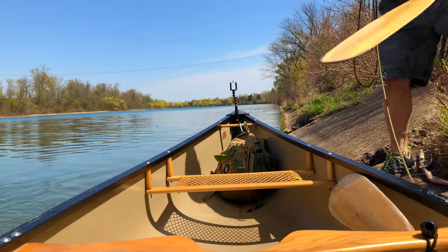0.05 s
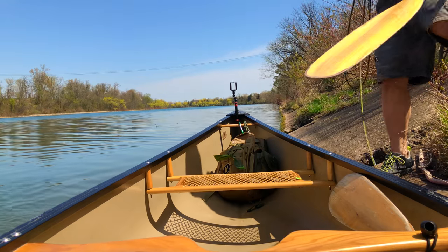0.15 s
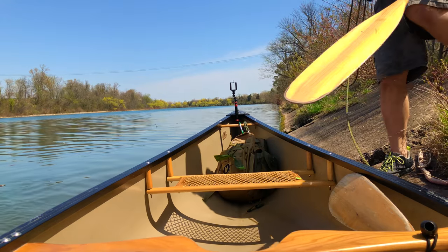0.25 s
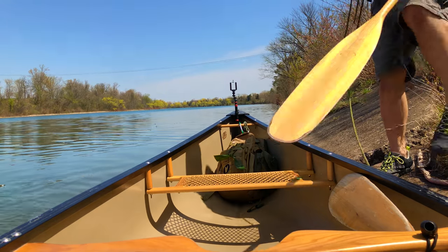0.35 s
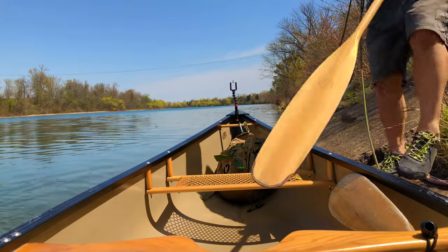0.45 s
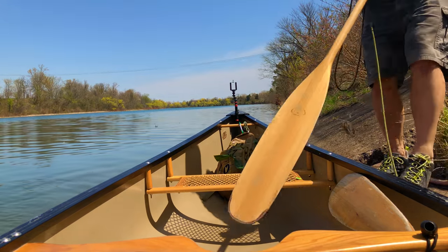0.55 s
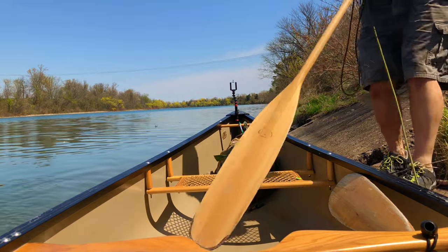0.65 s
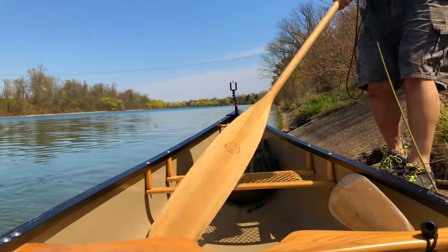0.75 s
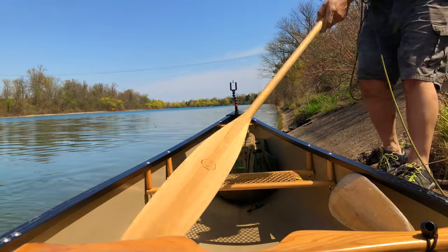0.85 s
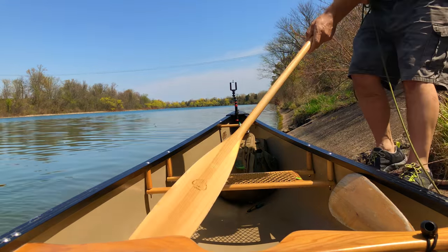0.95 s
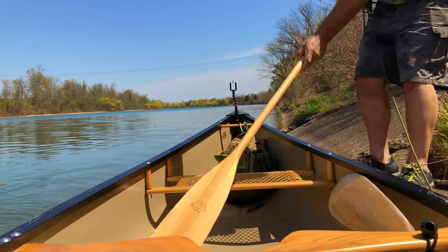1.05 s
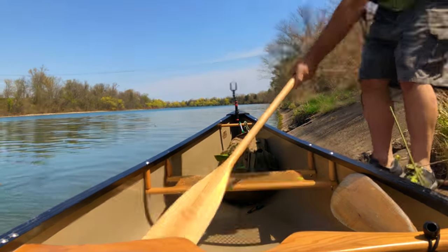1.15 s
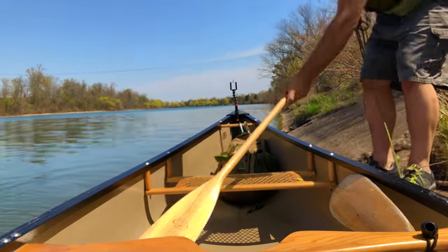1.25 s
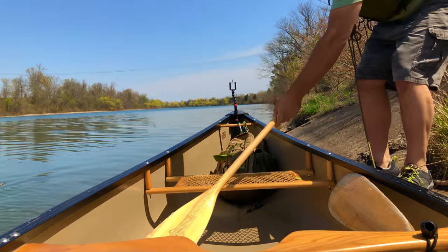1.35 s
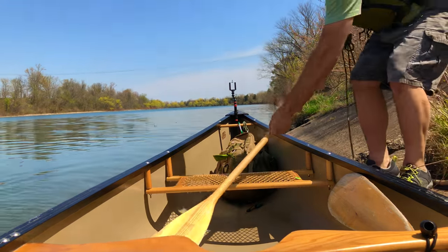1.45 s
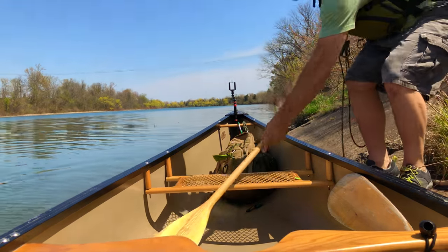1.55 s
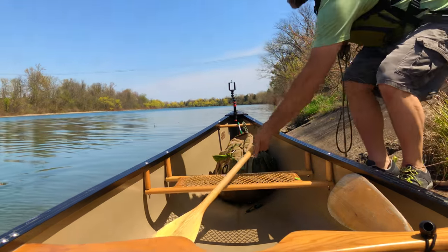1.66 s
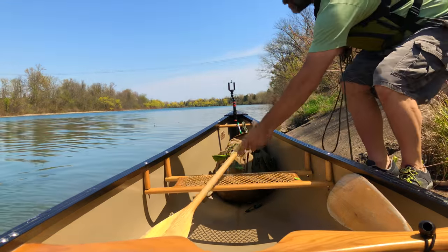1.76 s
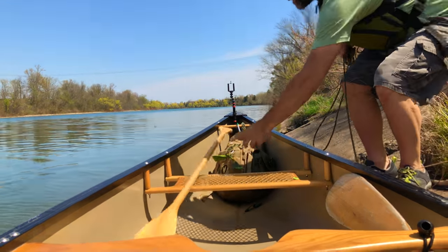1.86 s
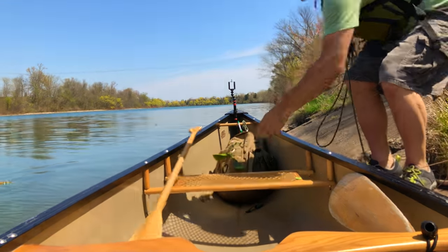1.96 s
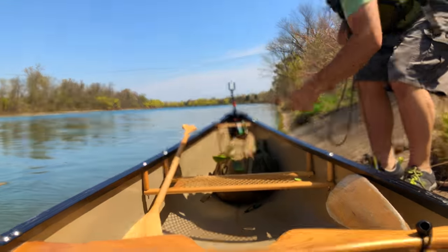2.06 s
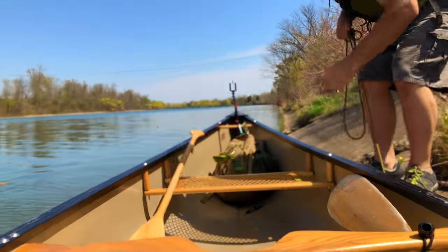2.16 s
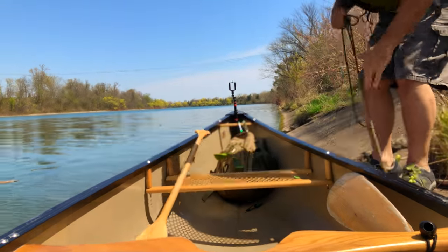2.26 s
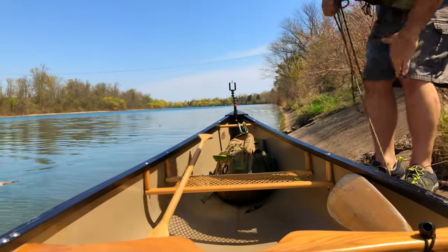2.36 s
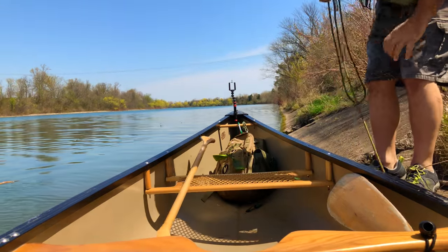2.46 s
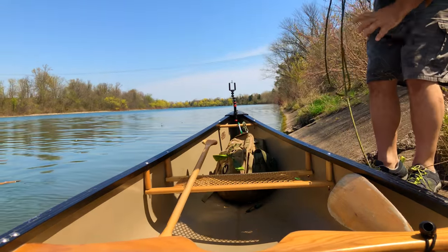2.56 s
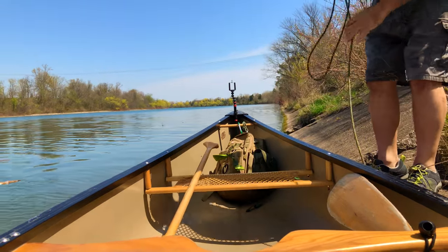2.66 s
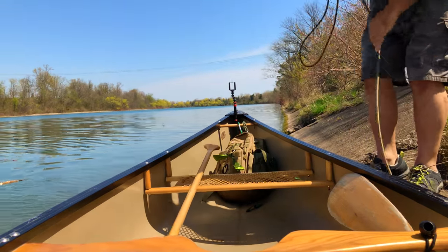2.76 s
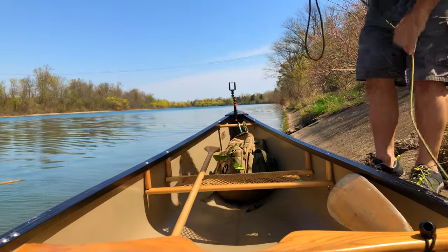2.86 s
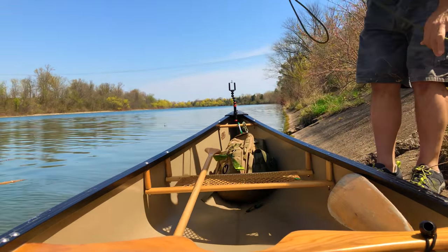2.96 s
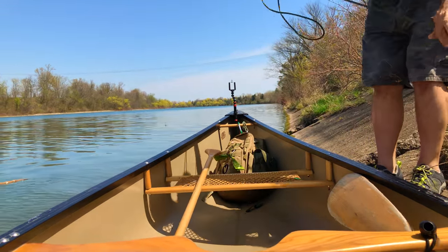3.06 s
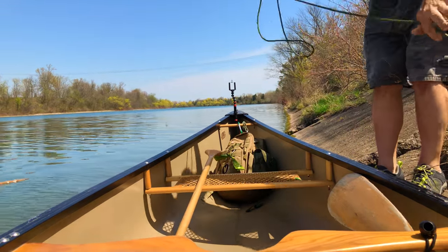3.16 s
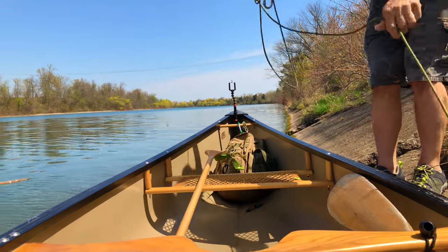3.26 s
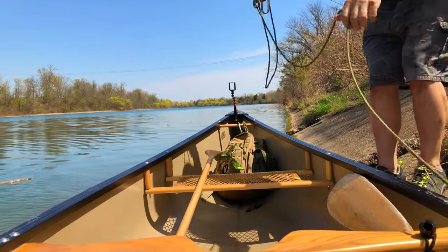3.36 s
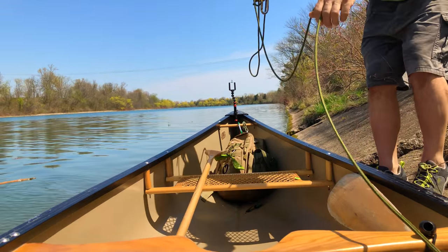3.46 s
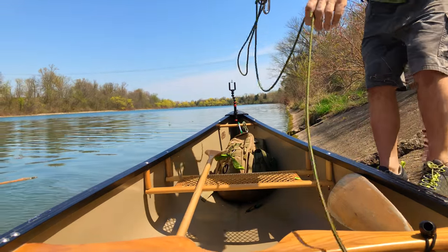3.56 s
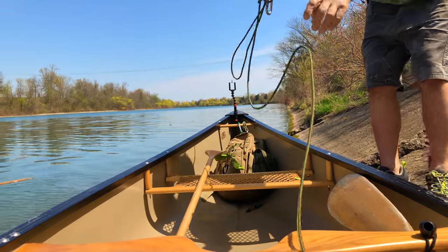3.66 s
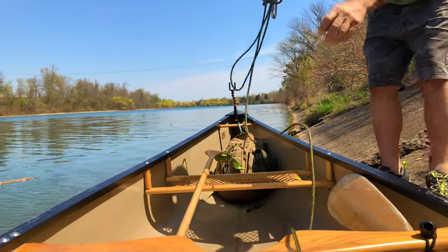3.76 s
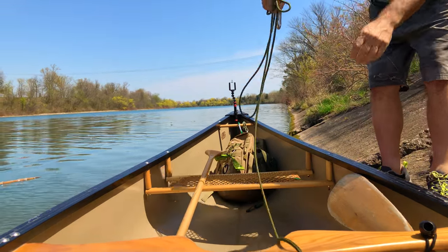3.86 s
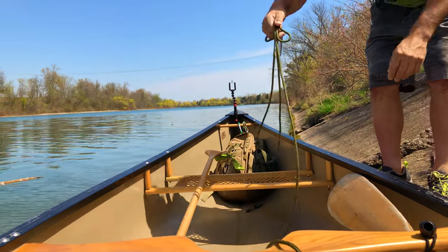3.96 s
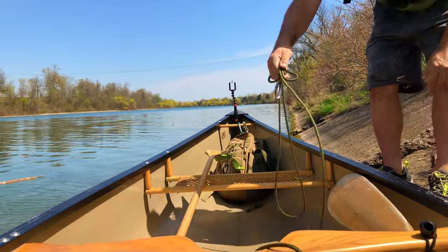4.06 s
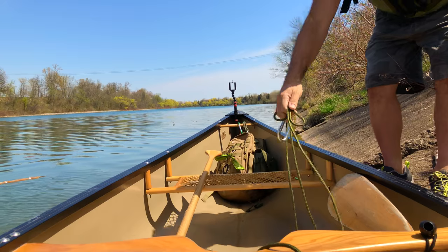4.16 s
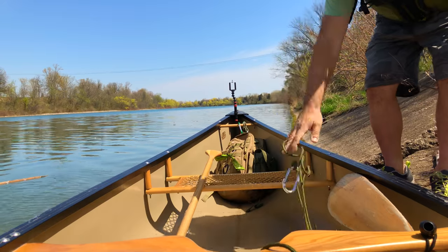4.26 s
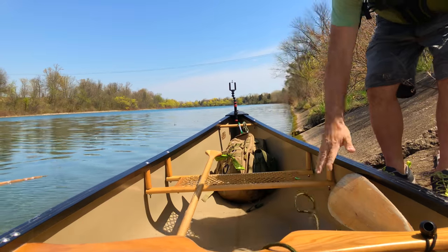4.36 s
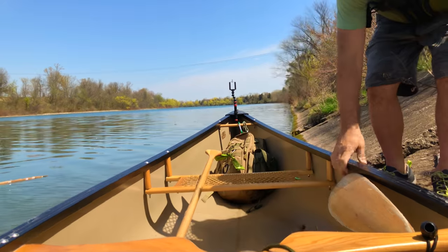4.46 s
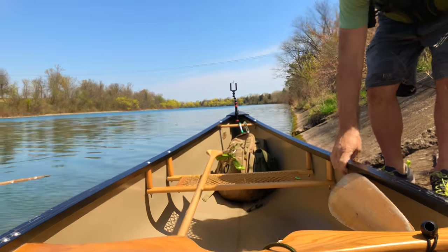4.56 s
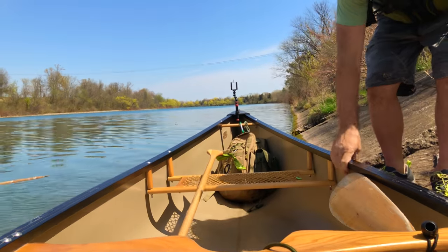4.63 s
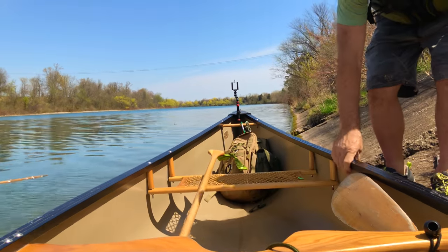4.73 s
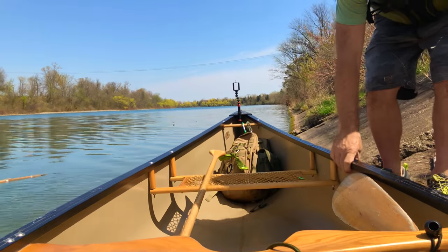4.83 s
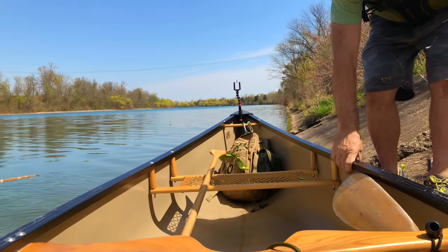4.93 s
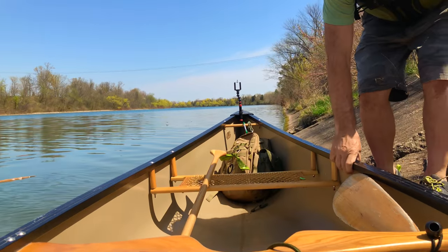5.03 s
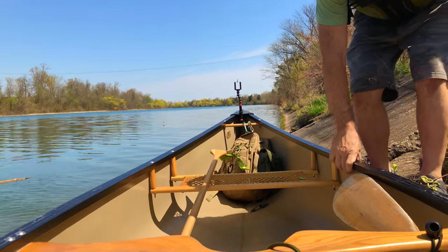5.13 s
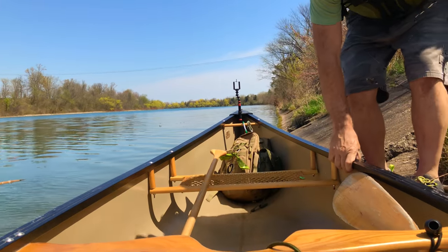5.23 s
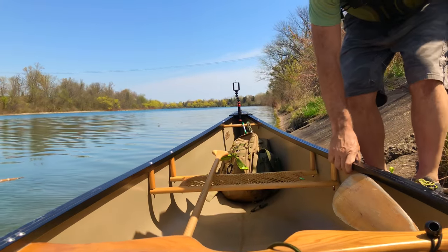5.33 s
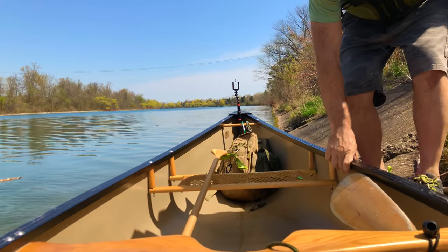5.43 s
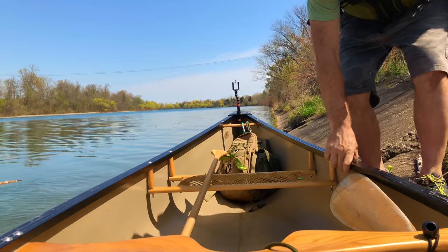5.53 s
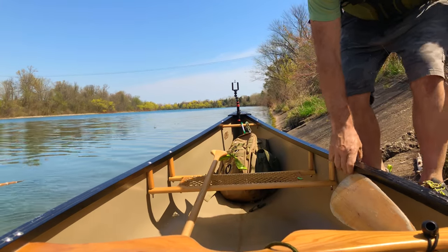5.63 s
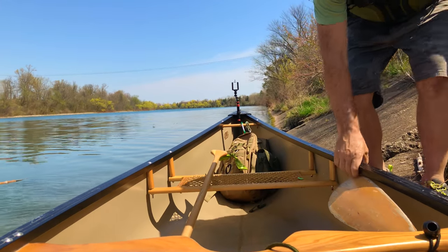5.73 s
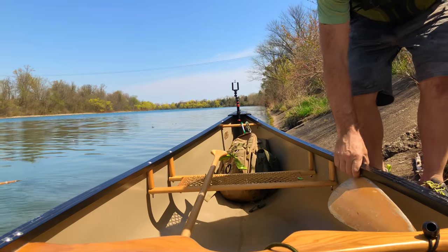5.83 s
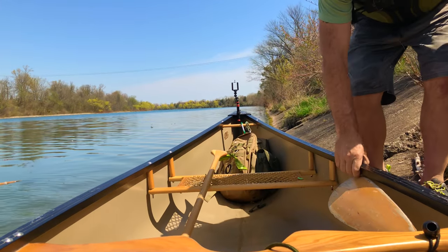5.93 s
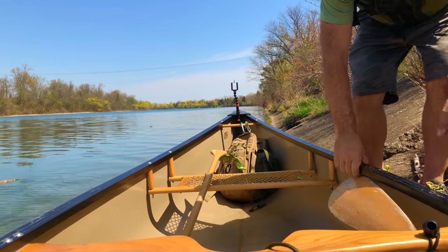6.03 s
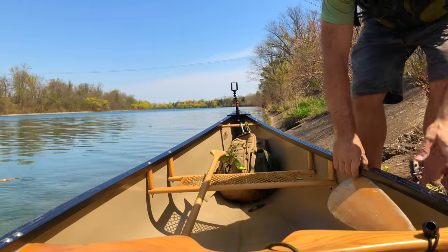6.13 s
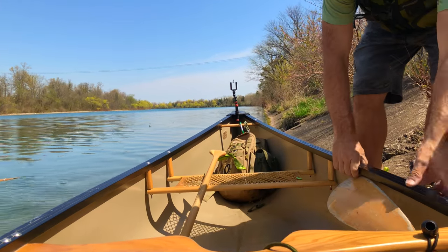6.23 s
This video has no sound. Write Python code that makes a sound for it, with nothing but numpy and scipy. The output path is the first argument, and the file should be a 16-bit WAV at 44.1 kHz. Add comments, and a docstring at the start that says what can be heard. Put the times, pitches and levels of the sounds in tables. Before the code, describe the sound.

Inside a moored canoe: soft water laps, a clattering wooden paddle and stuttering scrape, a sharp gunwale knock with metal clink, a short squeal and scuff.

```python
"""Loading a canoe at a canal bank

Heard from inside a canoe that lies against a concrete bank while someone loads it and gets ready to step in. A
wooden paddle touches down, clatters into the hull and slides; a snap hook and a hand land on the gunwale.
Knocks travel through the thin hull as bending waves that run through noise echoes and paddle modes. Laps and
two light knocks are short swelling tones; rubbing, scuffing and gear are slips and noise in resonances.
Coloured noise is the water along the bank and the paddle's soft hiss; a far bird whistles a gliding sine."""
import sys
import numpy as np
from scipy import signal
from scipy.fft import rfft, irfft
from scipy.io import wavfile

SR = 44100
rng = np.random.default_rng(int(sys.argv[2]) if len(sys.argv) > 2 else 0)


def int16_out(signal):
    """Quantize to a 16-bit WAV file."""
    q = np.round(np.clip(np.atleast_2d(signal).T, -1, 1) * 32767)
    wavfile.write(sys.argv[1], SR, q.astype(np.int16))


N = 277328
TIME = np.arange(N) / SR
ALL_HZ = np.arange(N // 2 + 1) * SR / N
# time and frequency axes of one short event
SIZE = 32768
AGE, FREQ = np.arange(SIZE) / SR, np.arange(SIZE // 2 + 1) * SR / SIZE


def from_db(db):
    """Decibels to gain."""
    return 10 ** (np.asarray(db) / 20)


def rms_one(x):
    """Scale to unit rms."""
    return x / np.sqrt(np.mean(x ** 2) + 1e-20)


def at_hz(points, hz):
    """Read (Hz, value) points on a log-frequency axis."""
    known_hz, values = np.transpose(points)
    return np.interp(np.log(np.maximum(hz, 1)), np.log(known_hz), values)


def add(out, sound, s):
    """Mix a sound in from time s."""
    start = int(round(s * SR))
    skip, start = max(-start, 0), max(start, 0)
    part = sound[skip:skip + N - start]
    out[start:start + len(part)] += part


def fade(t60):
    """Exponential decay by 60 dB in t60."""
    return np.exp(-np.log(1000) * AGE / t60)


def drift(rate):
    """Slow random wandering of rms 1 through `rate` bounded random points a second."""
    knots = rng.uniform(-1, 1, 8192)
    return rms_one(np.interp(TIME * rate, np.arange(len(knots)), knots))


def swells(rows):
    """Gain over time of (middle, length, dB) movements that rise and fall smoothly."""
    return sum(from_db(db) * 0.5 ** ((2 * (TIME - s) / length) ** 2) for s, length, db in rows)


def stroke(start, length, attack_s, release_s, sag_db):
    """Gain of a rubbing stroke: it sets in, sags over its length (negative sag: grows) and dies away."""
    age = TIME - start
    attack = np.clip(age / attack_s, 0, 1)
    sag = from_db(-sag_db * np.clip(age / length, 0, 1))
    release = np.exp(-np.maximum(age - length, 0) / release_s)
    return attack * sag * release


def resonance(freq, hz, width):
    """Response of one resonator, 1 on top."""
    return 1j * freq * width / (hz ** 2 - freq ** 2 + 1j * freq * width)


def coloured(x, spectrum):
    """Give a long signal a (Hz, dB) spectrum; rms 1."""
    return rms_one(irfft(rfft(x) * from_db(at_hz(spectrum, ALL_HZ)), N))


def grains(per_s, spread_db):
    """Random tiny slips of uneven size and either sign; rms 1."""
    sizes = from_db(spread_db * np.minimum(rng.exponential(1, N), 4))
    signs = rng.choice([-1, 1], N)
    happens = rng.random(N) < per_s / SR
    return rms_one(sizes * signs * happens)


def slip_train(per_s, jitter, spread_db):
    """Stick and slip at a nearly regular rate: one uneven click for each slip; rms 1."""
    cycles = np.cumsum(per_s * (1 + jitter * drift(300))) / SR
    clicks = np.diff(np.floor(cycles), prepend=0)
    return rms_one(clicks * from_db(spread_db * rng.standard_normal(N)))


def body(slips, modes, wander_db=2.4, wander_per_s=16):
    """Slips ring (Hz, width, dB) resonances, each swelling and fading as the contact moves; rms 1."""
    out = 0
    for hz, width, db in modes:
        narrow = signal.iirpeak(hz, hz / width, fs=SR)
        broad = signal.iirpeak(hz, 2, fs=SR)  # deepens the valleys between resonances
        ringing = signal.lfilter(*broad, signal.lfilter(*narrow, slips))
        out = out + from_db(db + wander_db * drift(wander_per_s)) * ringing
    return rms_one(out)


def friction(modes, per_s, spread_db):
    """Irregular stick and slip: dense small clicks into a set of resonances; rms 1."""
    return body(grains(per_s, spread_db), modes)


def gliding(slips, hz, width):
    """Slips ring a resonance whose pitch moves, filtered in a frame turning with it; rms 1."""
    turn = np.exp(2j * np.pi * np.cumsum(hz) / SR)
    r = np.exp(-np.pi * width / SR)
    ringing = signal.lfilter([1], [1, -2 * r, r * r], slips * turn.conj())
    return rms_one((turn * ringing).real)


# Far bird. Each row: start in seconds, level in dB added to the note.
BIRD_CALLS = [(0.136, -66.5), (3.262, -72), (5.693, -66.5)]
# Its slurred note. Each row: time from its start in seconds, pitch in Hz, relative level in dB.
BIRD_NOTE = [(0, 2800, -17), (.018, 2640, 3.5), (.045, 2540, 5.5), (.08, 2560, 7), (.112, 2620, -3),
             (.18, 2620, -16)]


def bird():
    """One thin slurred whistle, a gliding sine repeated every few seconds."""
    out, (s, hz, db) = np.zeros(N), np.transpose(BIRD_NOTE)
    whistle = np.sin(2 * np.pi * np.cumsum(np.interp(AGE, s, hz)) / SR)
    note = from_db(np.interp(AGE, s, db, right=-120)) * whistle
    for start, level_db in BIRD_CALLS:
        add(out, from_db(level_db) * note, start)
    return out


# Water along the bank, and the soft hiss of the sliding paddle around 1.35 s and from 1.9 to 3.15 s.
# Each row: time in seconds, level in dB before a common trim.
WASH_AND_HISS_LEVEL = [(0, -65.5), (1.1, -66), (1.35, -48.5), (1.65, -66.5), (1.9, -55), (3.15, -59),
                       (3.45, -65), (4.3, -66), (5.03, -57), (5.93, -64), (6.06, -57), (6.29, -55.5)]
# Their common colour. Each row: frequency in Hz, relative level in dB.
WASH_AND_HISS_COLOUR = [(120, -29), (200, 1), (244, -1), (490, 0.5), (652, -8), (741, -6.5), (1620, -11),
                        (2010, -17), (6000, -27.5), (7800, -40), (13200, -120)]


def wash_and_hiss(trim_db=0.5, flutter_db=2.5):
    """Water along the bank and the paddle's soft hiss: one coloured noise that comes, goes and flutters."""
    level = from_db(np.interp(TIME, *np.transpose(WASH_AND_HISS_LEVEL)))
    flutter = from_db(trim_db + flutter_db * drift(25))
    return level * flutter * coloured(rng.standard_normal(N), WASH_AND_HISS_COLOUR)


# Ripples under the hull. Each row: middle in seconds, length in seconds, level in dB before a common trim.
RIPPLES = [(0.01, 0.054, -45.5), (0.24, 0.084, -42), (0.61, 0.077, -51.5), (1.3, 0.4, -50.5),
           (2.5, 0.92, -46), (3.12, 0.26, -55), (3.92, 0.34, -45), (4.7, 0.28, -52.5), (5.52, 0.24, -48.5),
           (5.78, 0.18, -51)]
# Colour of the rumble. Each row: frequency in Hz, relative level in dB.
RUMBLE_COLOUR = [(15, -37), (25, -42.5), (50, 7.5), (75, 6), (188, -1), (257, -12), (365, -24), (500, -24),
                 (650, -52.5), (1100, -120)]


def rumble(calm_db=-59.5, trim_db=-1.0, lumps_db=4.5):
    """Ripples rock the hull: low lumpy noise swells with each and never falls quite silent."""
    rocking = np.hypot(from_db(calm_db), swells(RIPPLES))
    lumps = from_db(trim_db + lumps_db * drift(22))
    return rocking * lumps * coloured(rng.standard_normal(N), RUMBLE_COLOUR)


# Movements of clothes and rope. Each row: middle in seconds, length in seconds, level in dB.
RUSTLES = [(0.23, 0.15, -54), (0.47, 0.25, -59), (0.72, 0.089, -57), (0.93, 0.17, -67), (1.38, 0.11, -62.5),
           (1.85, 0.06, -59), (2.62, 0.39, -61), (3.04, 0.13, -59.5), (3.68, 0.3, -61), (4.03, 0.15, -57),
           (4.31, 0.27, -61), (4.85, 0.35, -64), (5.16, 0.2, -69), (5.6, 0.19, -66.5), (5.79, 0.11, -64.5)]
# Colour of the rustle. Each row: frequency in Hz, relative level in dB.
RUSTLE_COLOUR = [(1500, -9), (2500, -9.5), (4500, -8.5), (7500, -9), (11000, -7.5), (14000, -7),
                 (15500, -10), (16500, -22)]


def rustle(calm_db=-70.5, flutter_db=2.5):
    """Clothes and rope rustle with each movement: a dense rain of tiny slips, bright and fluttering."""
    moving = np.hypot(from_db(calm_db), swells(RUSTLES))
    flutter = from_db(flutter_db * drift(60))
    return moving * flutter * coloured(grains(per_s=10000, spread_db=3.5), RUSTLE_COLOUR)


# Water slapping under the hull, and light hull knocks at 2.947 and 2.999 s. Each row: start in seconds, level
# in # dB before a trim, middle of the sagging pitch in Hz, cycles of that pitch to the peak, splash in dB #
# before its trim and cap.
LAPS_AND_LIGHT_KNOCKS = [(0.016, -46, 102.6, 3.3, -47.5), (0.147, -43, 99, 0.86, -66),
                         (0.223, -39, 160, 1.2, -63), (0.237, -43.5, 420, 1, -43),
                         (0.386, -49, 153, 1.4, -48), (0.569, -49.5, 120, 4.8, -74),
                         (0.92, -43.5, 165, 1.14, -58), (1.092, -38.5, 148, 2, -72),
                         (1.871, -40, 318, 4.7, -35.5), (2.947, -32.5, 760, 1.3, -34),
                         (2.9988, -36, 358, 1.2, -47), (3.288, -49.5, 603, 8.7, -45),
                         (3.309, -50, 710, 2.3, -41), (3.335, -58, 816, 1.9, -53),
                         (3.688, -38, 174, 1.2, -61.5), (3.787, -50.5, 1060, 2.3, -37),
                         (3.819, -35.5, 384, 1.4, -55), (3.8286, -19, 175, 1.2, -62),
                         (3.848, -38.5, 278, 1.2, -66), (3.894, -39, 232, 1.5, -70),
                         (3.983, -46.5, 198, 1.7, -42.5), (3.987, -59, 1130, 1.6, -45),
                         (4.092, -40.5, 584, 3.1, -51.5), (4.24, -55, 624, 8.5, -51),
                         (4.376, -38, 154, 0.94, -69), (5.426, -31, 238, 0.88, -59),
                         (5.514, -31.5, 201, 1.37, -33.5), (5.538, -33.5, 157, 0.61, -53),
                         (5.704, -42, 455, 1.9, -46), (5.782, -34.5, 262, 1.65, -58)]


def laps_and_light_knocks(sag=0.32, sag_s=0.01, body_db=0.5, overtone_db=-9, splash_db=-7.0,
                         splash_t60=0.066, smack_db=-23, hull_db=-17, hull_t60=0.16):
    """Water slaps and two light knocks: swelling cycles sag in pitch, with a noise splash and dull after-ring."""
    out = np.zeros(N)
    for s, db, hz, swell_cycles, wet_db in LAPS_AND_LIGHT_KNOCKS:
        # the pitch falls from 1 + sag to 1 - sag times its middle
        phase = 2 * np.pi * np.cumsum(hz * (1 + sag * (2 * np.exp(-AGE / sag_s) - 1))) / SR
        rise = AGE * hz / swell_cycles
        swell = rise ** 2 * np.exp(2 * (1 - rise))
        slap = swell * np.sin(phase) + from_db(overtone_db) * swell ** 2 * np.sin(2 * phase)
        noise = rfft(rng.standard_normal(SIZE))
        splash_gain = from_db(min(wet_db + splash_db, db + 5.0))
        splash = splash_gain * rms_one(irfft(noise * resonance(FREQ, 696, 580) ** 2))
        smack = from_db(db + smack_db) * rms_one(irfft(noise * resonance(FREQ, 560, 170) ** 2))
        after = rms_one(irfft(noise * resonance(FREQ, hz, hz) ** 2)) * fade(hull_t60) * np.minimum(rise, 1)
        tone = from_db(db + body_db) * (slap + from_db(hull_db) * after)
        add(out, tone + (splash + smack) * fade(splash_t60), s)
    return out


# Soles shifting on the bank. Each row: middle in seconds, length in seconds, level in dB.
SHUFFLES = [(3.31, 0.022, -61), (4.41, 0.06, -50), (6.18, 0.34, -55.5)]
# Resonances under them. Each row: frequency in Hz, width in Hz, relative level in dB.
SHUFFLE_MODES = [(484, 110, 0), (726, 59, -0.5), (1015, 84, -5), (1580, 170, -15.5), (2480, 700, -22),
                 (3370, 150, -21), (4770, 400, -23)]


def shuffle(flutter_db=4.5):
    """Soles shift softly on the bank: fluttering friction in a few low resonances."""
    flutter = from_db(flutter_db * drift(50))
    return swells(SHUFFLES) * flutter * friction(SHUFFLE_MODES, per_s=1500, spread_db=-1.0)


# Resonances under the scuffing sole. Each row: frequency in Hz, width in Hz, relative level in dB.
SCUFF_MODES = [(555, 76, 4), (768, 55, 9), (1040, 44, 8), (1456, 39, 5.5), (1810, 72, 1), (2073, 30, -8),
               (2910, 66, -4), (4100, 90, -15), (4870, 80, -20)]
SCUFF_S, SCUFF_LENGTH_S = 5.247, 0.052
SCUFF_DB, SCUFF_SAG_DB = -40, -2.5   # the stroke itself grows a little
SCUFF_ATTACK_S, SCUFF_RELEASE_S = 0.0099, 0.033
SCUFF_HZ, SCUFF_SLIPS_PER_S = 1325, 390   # both at the start
SCUFF_SINK_OCTAVES_PER_S = 8.7


def scuff(width_hz=480, grit_db=-7, grit_fade_db_per_s=60):
    """A shoe judders over concrete: as it slows the slips spread, the pitch sinks, the resonances fade."""
    age = np.clip(TIME - SCUFF_S, 0, 2 * SCUFF_LENGTH_S)
    speed = 2 ** (-SCUFF_SINK_OCTAVES_PER_S * age)
    judder = slip_train(SCUFF_SLIPS_PER_S * speed, jitter=.08, spread_db=4.0)
    slips = judder + from_db(grit_db) * grains(per_s=1500, spread_db=3.0)
    sinking = gliding(slips, SCUFF_HZ * speed, width_hz)
    under = from_db(-grit_fade_db_per_s * age) * body(slips, SCUFF_MODES)
    shape = stroke(SCUFF_S, SCUFF_LENGTH_S, SCUFF_ATTACK_S, SCUFF_RELEASE_S, SCUFF_SAG_DB)
    return from_db(SCUFF_DB) * shape * (sinking + under)


# Clicks of gear, grit and the rattling snap hook. Each row: start in seconds, level in dB before a
# common trim, middle against top in dB, decay t60 in seconds.
TICKS = [(0.508, -31.5, -36, 0.0092), (0.666, -21, -14.5, 0.076), (0.7177, -25.5, 8, 0.06),
         (3.368, -42.5, -15.5, .025), (3.666, -40, -2, 0.015), (3.734, -41, 5, 0.018),
         (4.2832, -32.5, -23, 0.018), (4.42, -41, 10, 0.084), (4.447, -13.5, -8, 0.054),
         (4.451, -14, -17, .025), (4.465, -20, -6, 0.046), (4.496, -36, 19, 0.088),
         (4.517, -38.5, 15, 0.043), (4.535, -41, 10, 0.086), (4.559, -28.5, 9, 0.024),
         (4.576, -40, -2, 0.033), (4.7289, -21.5, 22, 0.031), (4.8712, -39.5, -17, 0.027),
         (5.113, -41, 26, 0.051), (5.515, -41, 14, 0.057), (5.5492, -40.5, 11, 0.039),
         (5.652, -38.5, -4.5, 0.041), (5.753, -44.5, -17, 0.026)]


def ticks(trim_db=-11, top_hz=13500, top_width_hz=7500, snap_db=5, snap_t60=0.0043):
    """Hard little contacts: noise with a bright top and its own share of middle, a snap and a short crack."""
    out = np.zeros(N)
    for s, db, middle_db, t60 in TICKS:
        colour = resonance(FREQ, top_hz, top_width_hz) + from_db(middle_db) * resonance(FREQ, 3900, 12000)
        crack = rms_one(irfft(rfft(rng.standard_normal(SIZE)) * colour))
        add(out, from_db(db + trim_db) * crack * (fade(t60) + from_db(snap_db) * fade(snap_t60)), s)
    return out


# Snap hook on the gunwale. Each row: strike in seconds, level in dB added to the ring.
HOOK_STRIKES = [(4.446, -37), (4.56, -39)]
# Its ringing. Each row: frequency in Hz, relative level in dB, decay t60 in seconds.
HOOK_MODES = [(7110, -4, 0.062), (7170, -7, 0.068), (10900, -9, 0.067), (13750, -10, 0.041)]


def hook():
    """The metal snap hook clinks: high decaying sines, damped by the hand."""
    out = np.zeros(N)
    ring = sum(from_db(db) * fade(t60) * np.sin(2 * np.pi * hz * AGE) for hz, db, t60 in HOOK_MODES)
    for s, db in HOOK_STRIKES:
        add(out, from_db(db) * ring, s)
    return out


# The squeal of hull on bank. Each row: time in seconds, pitch in Hz before wavering, level in dB.
SQUEAL = [(4.794, 3670, -37), (4.809, 3860, -64), (4.86, 3900, -56), (4.956, 3840, -56.5),
          (5.036, 3870, -61), (5.115, 3940, -52.5), (5.18, 3920, -60), (5.245, 3960, -62)]
# Resonances that glide with it. Each row: ratio to its pitch, width in Hz, relative level in dB.
SQUEAL_MODES = [(.69, 190, -11), (1, 337, -3.5), (1.265, 280, -18)]
# The rough squeak. Each row: frequency in Hz, width in Hz, relative level in dB.
SQUEAK_MODES = [(1430, 140, -3), (1820, 160, 5), (3520, 160, 3), (4560, 330, -2), (5720, 170, -20),
                (6450, 300, -10), (7800, 200, -18)]
# Groans where it presses hardest. Each row: middle in seconds, length in seconds, level in dB.
GROANS = [(5.02, 0.035, -46), (5.095, 0.076, -47.5), (5.17, 0.033, -52.5)]
# Resonances of the groan. Each row: frequency in Hz, width in Hz, relative level in dB.
GROAN_MODES = [(216, 37, -5), (350, 14, 4), (440, 28, -2), (564, 26, -1), (632, 29, -7), (940, 44, -13)]
RUB_S, RUB_LENGTH_S, RUB_SAG_DB = 4.793, 0.45, 3
RUB_ATTACK_S, RUB_RELEASE_S = 0.003, 0.041
SQUEAK_DB, SQUEAL_SLIPS_PER_S = -63.5, 230


def rub(flutter_db=1.0, waver=0.008):
    """The hull grabs the concrete with a chirp, then quick slips ring a wavering squeal over a low groan."""
    drag = stroke(RUB_S, RUB_LENGTH_S, RUB_ATTACK_S, RUB_RELEASE_S, RUB_SAG_DB)
    s, hz, db = np.transpose(SQUEAL)
    pitch = np.interp(TIME, s, hz) * (1 + waver * drift(43))
    slips = slip_train(SQUEAL_SLIPS_PER_S, jitter=0.33, spread_db=2.0)
    squeal = sum(from_db(mode_db) * gliding(slips, ratio * pitch, width)
                 for ratio, width, mode_db in SQUEAL_MODES)
    squeal = from_db(np.interp(TIME, s, db)) * squeal
    squeak = from_db(SQUEAK_DB) * friction(SQUEAK_MODES, per_s=700, spread_db=0.0)
    groan = swells(GROANS) * friction(GROAN_MODES, per_s=2300, spread_db=1.0)
    return (drag * (squeak + squeal) + groan) * from_db(flutter_db * drift(80))


# The paddle on the hull. Each row: start in seconds, length in seconds, boom of the hull in dB,
# scrape of the wood in dB.
SLIDES = [(1.256, 0.12, -73, -54.5), (1.367, 0.073, -50, -52), (1.48, 0.087, -57, -59.5),
          (1.682, 0.06, -53, -53.5), (1.807, 0.07, -65, -50), (2.014, 0.049, -45, -47),
          (2.275, 0.2, -50.5, -54.5), (2.456, 0.484, -44.5, -53.5), (2.963, 0.26, -52.5, -60.5)]
# It catches and judders on. Each row: start in seconds, level in dB, decay t60 in seconds.
CATCHES = [(2.44, -41, 0.036), (2.476, -54, .04), (2.515, -59, 0.055), (2.549, -59, 0.045),
           (2.566, -54, 0.069), (2.613, -57, 0.092), (2.67, -47, .04), (2.688, -48, .11),
           (2.726, -43, 0.11), (2.7693, -43.5, 0.036), (2.809, -43, 0.067), (2.866, -45.5, 0.041),
           (2.909, -50, 0.07), (2.99, -44.5, .06), (3.05, -52.5, 0.11), (3.159, -62, .03)]
# Booming hull. Each row: frequency in Hz, width in Hz, relative level in dB.
BOOM_MODES = [(557, 45, 0), (641, 37, -1.5), (690, 33, -6), (824, 16.7, -6), (990, 63, -20.5)]
# Scraping wood. Each row: frequency in Hz, width in Hz, relative level in dB.
SCRAPE_MODES = [(1136, 160, 0), (1390, 80, -1.5), (1680, 140, 0), (2044, 69, 1.5), (2335, 80, 2.5),
                (2600, 74, -6.5), (3080, 98, -4.5), (3300, 55, -6), (3650, 49, -5), (3950, 50, -9.5),
                (4900, 330, -17.5)]
# Fine high rasp. Each row: frequency in Hz, width in Hz, relative level in dB.
RASP_MODES = [(10200, 650, -1), (11240, 900, -0.5)]
SLIDE_ATTACK_S, SLIDE_RELEASE_S, SLIDE_SAG_DB = 0.051, 0.015, 5   # each slide weakens as it slows


def slide(stutter_db=1.5, rasp_db=-13.0, rasp_flicker_db=3.5):
    """The paddle sticks and slips along the hull, which booms under scrape and rasp; catches are bursts."""
    boom, scrape, bursts = np.zeros(N), np.zeros(N), np.zeros(N)
    for s, length, boom_db, scrape_db in SLIDES:
        shape = stroke(s, length, SLIDE_ATTACK_S, SLIDE_RELEASE_S, SLIDE_SAG_DB)
        boom += shape * from_db(boom_db)
        scrape += shape * from_db(scrape_db)
    for s, db, t60 in CATCHES:
        add(bursts, from_db(db) * fade(t60), s)
    slips = grains(per_s=400, spread_db=3.0) * from_db(stutter_db * drift(70))
    rasp_gain = from_db(rasp_db + rasp_flicker_db * drift(33))
    rasp = rasp_gain * friction(RASP_MODES, per_s=1000, spread_db=4.0)
    sliding = boom * body(slips, BOOM_MODES) + scrape * (body(slips, SCRAPE_MODES) + rasp)
    return sliding + bursts * friction(SCRAPE_MODES, per_s=1500, spread_db=-1.0)


THUD_ORDER, CRACK_CORNER_HZ = 2.14, 1440   # the thud falls steeply above its corner, the crack gently


def contact(thud_db, corner_hz, crack_db):
    """Spectrum of a blow: a thud that reaches higher the harder the contact, and the crack of its edge."""
    thud = from_db(thud_db) ** 2 / (1 + (FREQ / corner_hz) ** (2 * THUD_ORDER))
    crack = from_db(crack_db) ** 2 / (1 + (FREQ / CRACK_CORNER_HZ) ** 2)
    return np.sqrt(thud + crack)


# Bending modes of the paddle. Each row: frequency in Hz, relative height in dB, decay t60 in seconds.
PADDLE_MODES = [(133, 17, .5), (264, 24, .4), (431, 10, .3), (571, 17, .3), (703, 17, .3), (845, 21, .26),
                (975, 9, .18), (1394, 14, .17), (1796, 15, .24), (2343, 17, .2), (2658, 20, .1),
                (2940, 22, .1), (3298, 19, .1), (4530, 14, .12), (5020, 12, .09), (6330, 15, .12)]


def hull_response(reflections_db, ring_db, bands, crunch_db=11.5, crunch_t60=0.036, crunch_hz=1700,
                  mode_spread_db=6.5):
    """Direct wave, crunch of the contact, dense reflections and paddle modes; unit power in each band."""
    crunch = rfft(rng.standard_normal(SIZE) * fade(crunch_t60))
    crunch *= from_db(crunch_db) / np.sqrt(np.mean(abs(crunch) ** 2))
    crunch *= FREQ ** 2 / (FREQ ** 2 + crunch_hz ** 2)  # weaker below crunch_hz
    # every blow lands on another spot and so favours other modes
    strengths = from_db(ring_db + mode_spread_db * rng.standard_normal(len(PADDLE_MODES)))
    ring = sum(strength * from_db(db) * resonance(FREQ, hz, np.log(1000) / np.pi / t60)
               for strength, (hz, db, t60) in zip(strengths, PADDLE_MODES))
    echoes, out = rng.standard_normal(SIZE), 0
    for band, envelope, echo_db in bands:
        tail = rfft(echoes * envelope)
        tail /= np.sqrt(np.average(abs(tail) ** 2, weights=band))
        wave = 1 + crunch + from_db(reflections_db + echo_db) * tail + from_db(echo_db / 2) * ring
        out = out + band / np.sqrt(np.average(abs(wave) ** 2, weights=band)) * wave
    return out


# Waves echoing between keel and gunwales. Each row: band centre in Hz, decay t60 in seconds, strength in
# dB added to the blow's own reflections, build-up in seconds.
HULL_ECHOES = [(50.5, 0.15, 10.5, 0.036), (133, 0.23, 13.5, 0.018), (334.5, 0.17, 11, 0.016),
               (680, 0.067, -2, 0.031), (1410, 0.098, 10.5, 0.00074), (2850, 0.098, -7.5, .003),
               (6500, 0.12, 5, 0.0025), (14000, 0.14, -4, .002)]


def echo_bands():
    """Weight over frequency, envelope and strength of each echo band, overlapping its neighbours."""
    centres, bands = [row[0] for row in HULL_ECHOES], []
    for own, (hz, t60, echo_db, build_s) in zip(np.eye(len(centres)), HULL_ECHOES):
        weight = at_hz(list(zip(centres, own)), FREQ)
        bands.append((weight, (1 - np.exp(-AGE / build_s)) * fade(t60), echo_db))
    return bands


# Blows on the hull; the faint first one, at 0.2855 s, is probably a sharp water slap.
# Each row: time in seconds, thud in dB, contact corner in Hz (higher is harder), crack in dB, pitch of the
# struck panel in Hz, its answer in dB, reflections in dB, paddle ring in dB.
# All levels are relative: the hull's colour and the evening out of each band follow.
KNOCKS_AND_SHARP_SLAP = [(0.2855, -6, 1070, -21, 660, 4, -14, -42),
                         (1.135, 18.5, 183, 11, 830, -1, -4.5, -31),
                         (1.146, 3.5, 520, -15, 460, 11, 3, -30), (1.166, 19, 188, -25, 127, 7, -27, -24.5),
                         (1.2195, 11, 287, -5, 225, 3.5, 2.5, -13.5), (1.264, 6, 238, -8, 133, 4, 11, -14),
                         (1.9131, 24, 1440, -16, 816, 6.5, -8, -38),
                         (1.99, 20.5, 1030, -22.5, 622, 6, -7.5, -45),
                         (2.0561, 22.5, 2130, 18, 3040, 11, -1.5, -11),
                         (2.066, 15.5, 2000, 15, 3050, 11, 1, -8),
                         (2.075, 32, 207, -21.5, 66.6, 5, -11.5, -40),
                         (2.123, 0, 2220, 18.5, 3210, -0.5, 5.5, -3),
                         (2.131, 19, 1410, -5.5, 793, 14, -6, -24),
                         (2.14, 8.5, 2020, 12.5, 2700, 8.5, -3, -14.5),
                         (2.1625, 16, 1520, 6, 864, 7, -4, -5), (2.189, 17.5, 1600, 1, 2970, 14.5, 10, -19),
                         (2.1947, 8, 2200, 7.5, 3130, 13, -9, -12.5),
                         (2.1957, 24, 1050, -14, 613, 5, -10, -30),
                         (2.2168, 19, 800, -27, 262, 7.5, -10, -5.5),
                         (2.241, 16.5, 880, -4, 550, 14.5, -1, -7),
                         (2.256, 10, 750, -26.5, 680, 10, -15, -23), (2.277, 10, 400, 11, 274, -7, 2, -5.5),
                         (2.309, 16, 930, -26, 640, 7, -1, -21), (2.351, 17, 267, -25, 198, 3, -3, -15),
                         (2.377, 15.5, 148, -35, 131, -8, -16, -17),
                         (2.441, 2.5, 587, -29, 690, 5, 10, -24), (2.9904, -1.5, 1400, -24, 405, 7, 2, -22),
                         (4.445, 29, 436, 12.5, 2700, 10.5, -1, -43),
                         (4.461, 23.5, 810, -5, 830, -3, 14, -15), (4.5, 23.5, 170, -23, 156, 1, -12, -40),
                         (4.559, 7, 900, -4, 790, 3.5, 6, -35), (4.574, 11.5, 494, -32, 500, -4, -14, -37),
                         (4.6195, 10, 700, -7, 510, -4, 7, -29), (4.729, 16.5, 1080, -1, 1090, 6, -7, -32),
                         (4.793, 8.5, 1070, -5, 920, 7, 1, -32)]
# Colour of the hull. Each row: frequency in Hz, gain in dB.
HULL_COLOUR = [(25, -24.5), (60, -10), (130, 3.5), (400, 2.5), (580, 7.5), (820, 1.5), (1050, -0.5),
               (1650, -3.5), (2100, -3), (3000, -4.5), (4000, -5.5), (8000, -6.5), (11500, -6),
               (13500, -11), (15500, -13)]
PANEL_Q = 7.1   # how sharply the struck panel answers
TRAVEL_MS = 2.8   # about the time a 1 kHz bending wave takes along the hull
LEAD = 512   # samples of room ahead of each blow


def knocks_and_sharp_slap(dispersion=1.05, slowest_hz=40):
    """Bending waves run faster the higher they are: a blow opens with a tick and sweeps down to a thump."""
    out, bands = np.zeros(N), echo_bands()
    delay = TRAVEL_MS / 1000 * (1000 / (FREQ + slowest_hz)) ** dispersion
    # summing the delay over frequency gives the phase of the travelling wave
    phase = 2 * np.pi * np.cumsum(delay + LEAD / SR) * SR / SIZE
    travel = np.exp(-1j * phase) * from_db(at_hz(HULL_COLOUR, FREQ))
    for s, thud_db, corner_hz, crack_db, panel_hz, panel_db, reflections_db, ring_db in KNOCKS_AND_SHARP_SLAP:
        panel = 1 + from_db(panel_db) * resonance(FREQ, panel_hz, panel_hz / PANEL_Q)
        blow = contact(thud_db, corner_hz, crack_db) * panel
        heard = irfft(blow * travel * hull_response(reflections_db, ring_db, bands))
        add(out, heard, s - LEAD / SR)
    return out


def scene():
    """Everything is heard from inside the canoe, in the open air, on one channel."""
    soft = bird() + wash_and_hiss() + rumble() + rustle() + laps_and_light_knocks()
    bank = shuffle() + scuff()
    canoe = ticks() + hook() + rub() + slide() + knocks_and_sharp_slap()
    return (soft + bank + canoe)[None]


CUTOFF_HZ = 16100


def record(dry, top=0.53, port_hz=15600, port_q=35, port_db=6):
    """The microphone port rings very high up, the loudest peaks are rounded and the top is cut."""
    port_ring = signal.lfilter(*signal.iirpeak(port_hz, port_q, fs=SR), dry)
    coloured_by_port = dry + from_db(port_db) * port_ring
    rounded = top * np.tanh(coloured_by_port / top)
    return signal.sosfilt(signal.ellip(10, .1, 80, CUTOFF_HZ, fs=SR, output="sos"), rounded)


dry = scene()
out = record(dry)
int16_out(out)
```